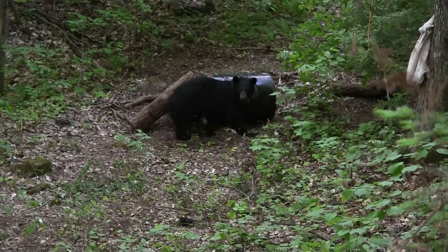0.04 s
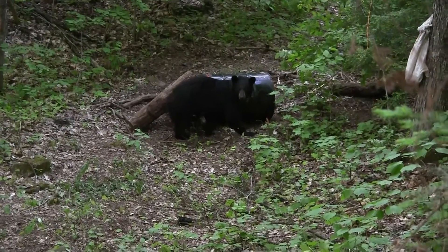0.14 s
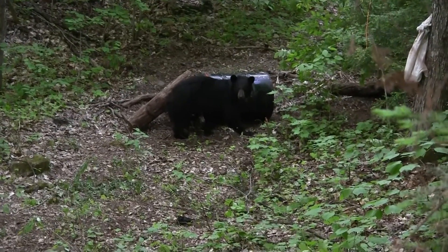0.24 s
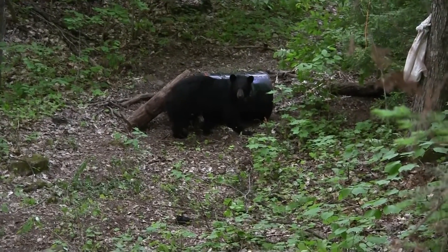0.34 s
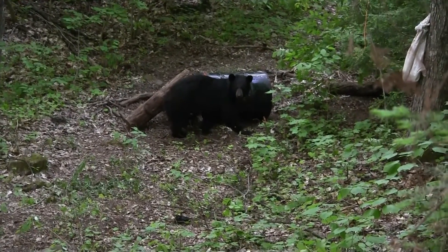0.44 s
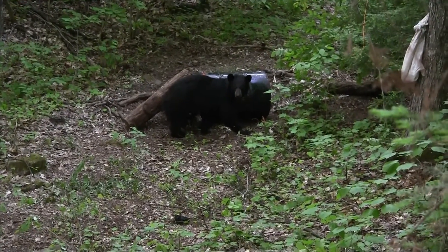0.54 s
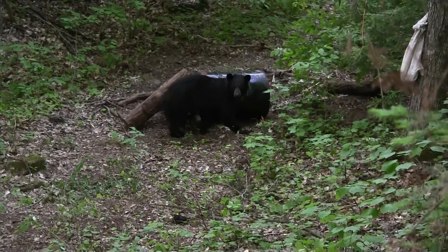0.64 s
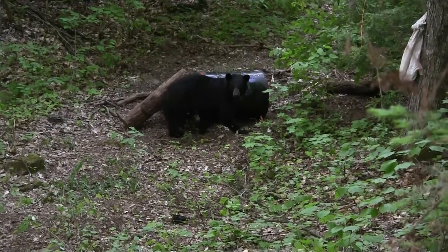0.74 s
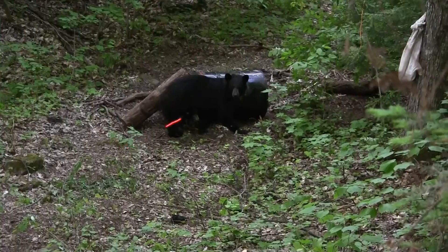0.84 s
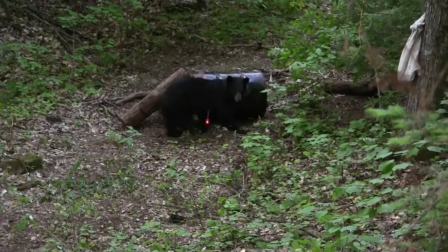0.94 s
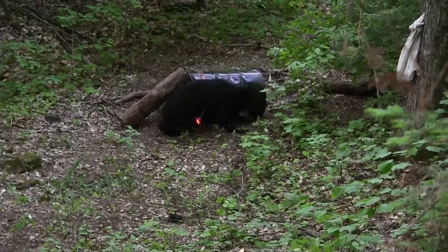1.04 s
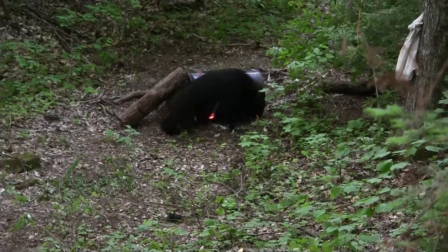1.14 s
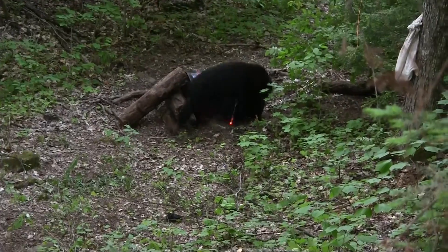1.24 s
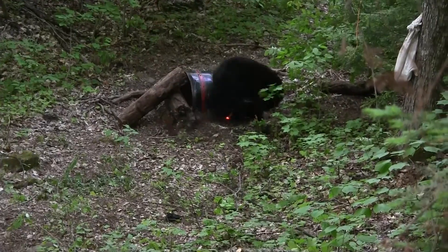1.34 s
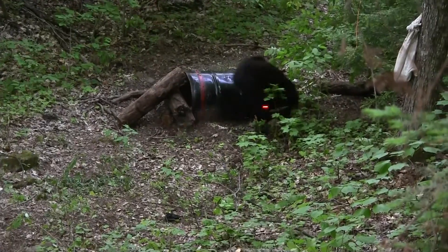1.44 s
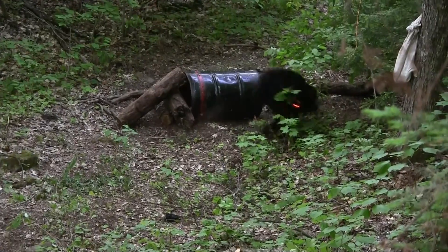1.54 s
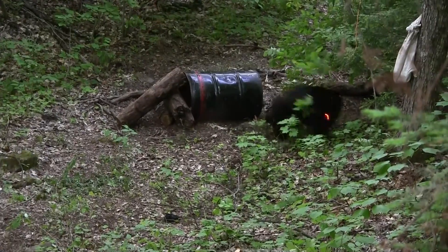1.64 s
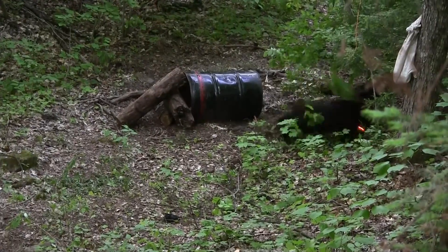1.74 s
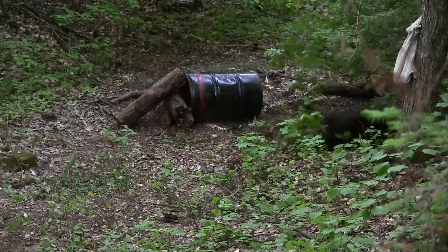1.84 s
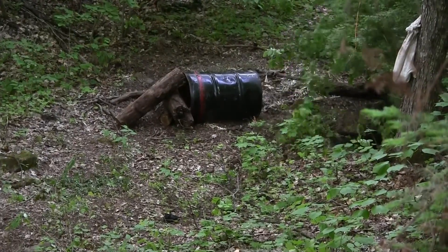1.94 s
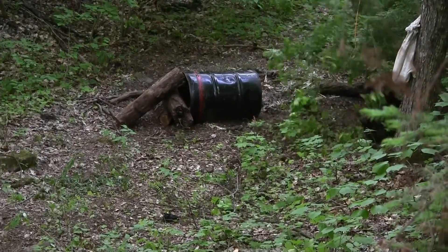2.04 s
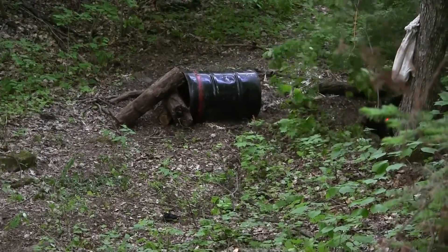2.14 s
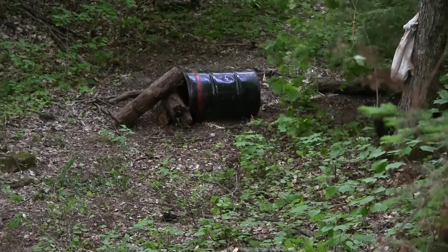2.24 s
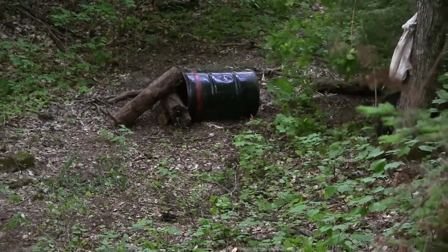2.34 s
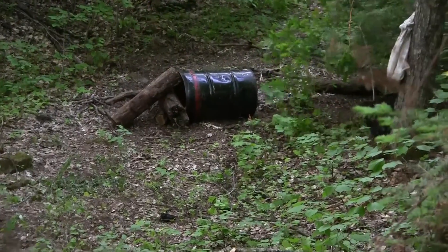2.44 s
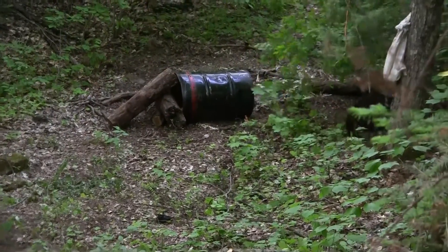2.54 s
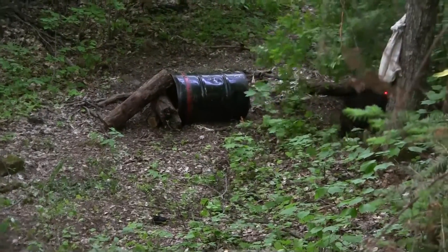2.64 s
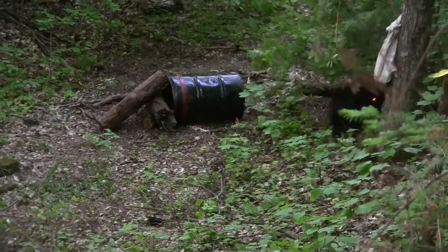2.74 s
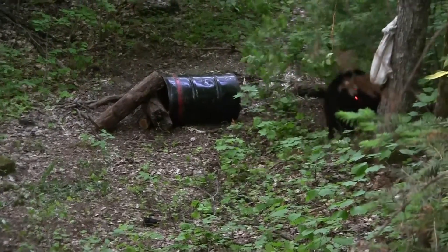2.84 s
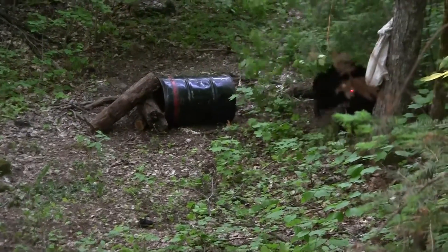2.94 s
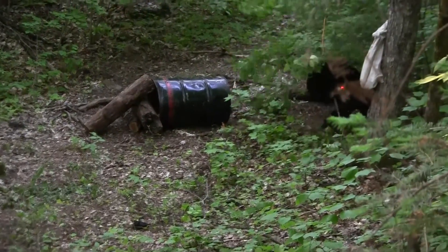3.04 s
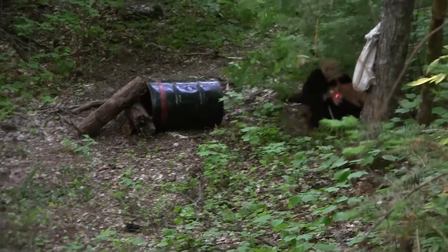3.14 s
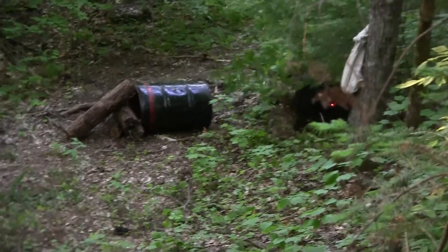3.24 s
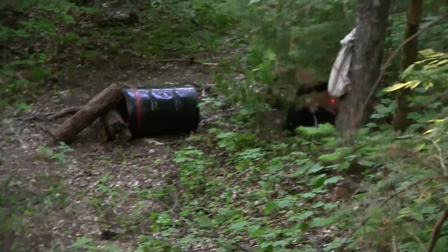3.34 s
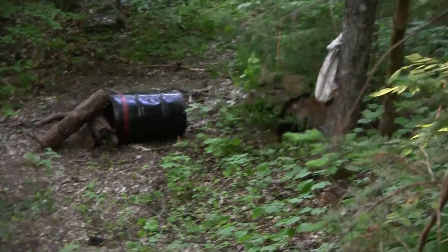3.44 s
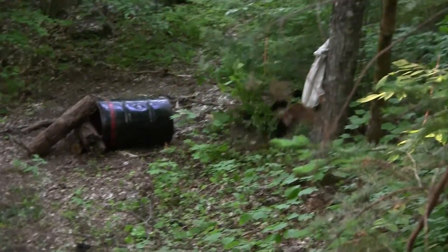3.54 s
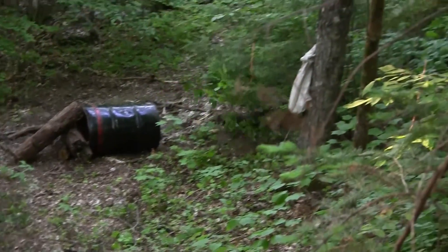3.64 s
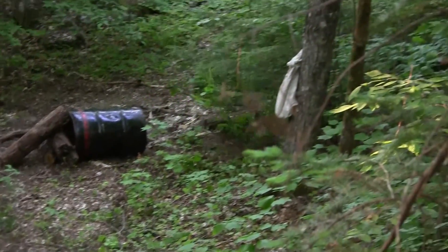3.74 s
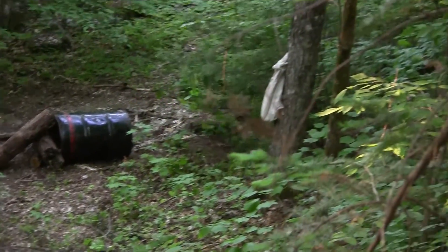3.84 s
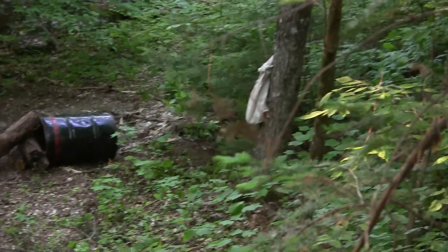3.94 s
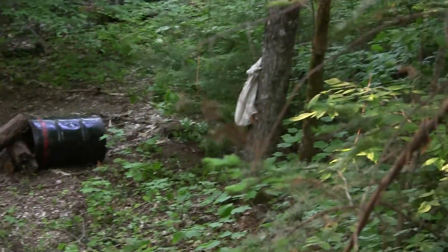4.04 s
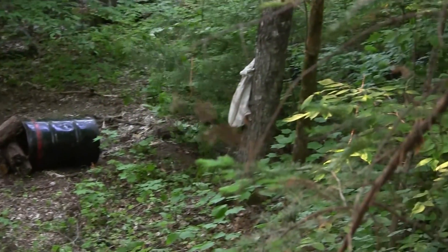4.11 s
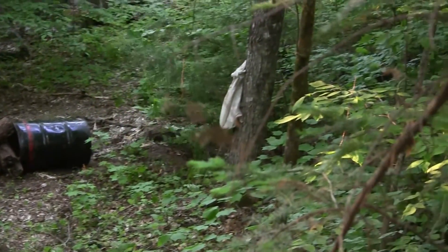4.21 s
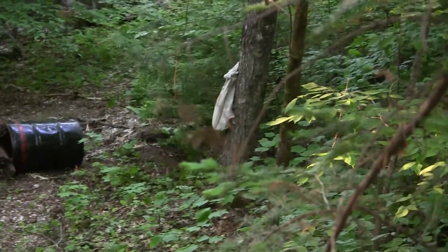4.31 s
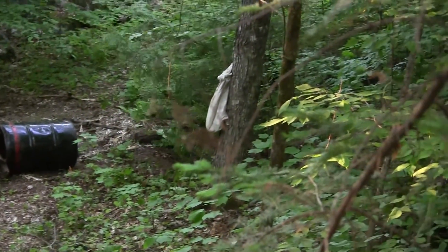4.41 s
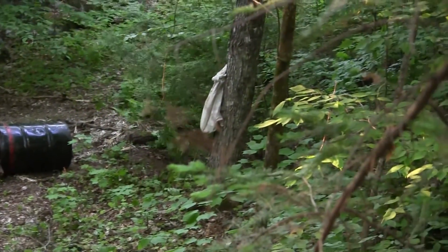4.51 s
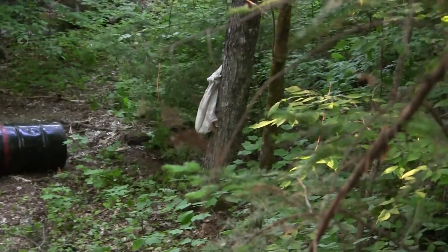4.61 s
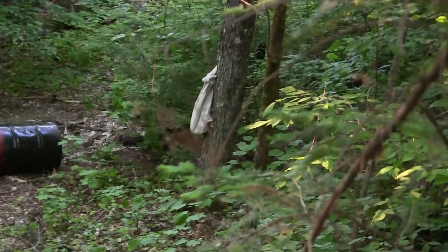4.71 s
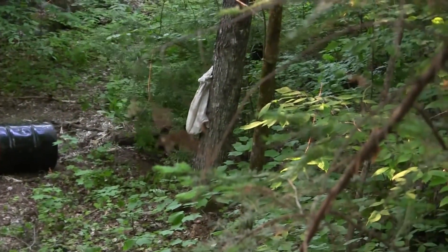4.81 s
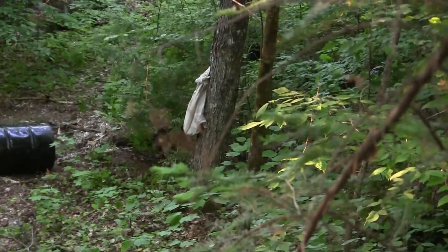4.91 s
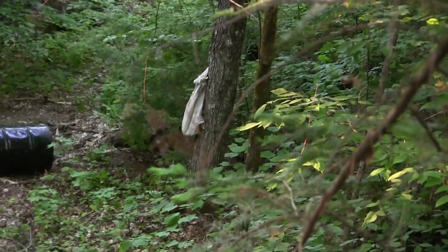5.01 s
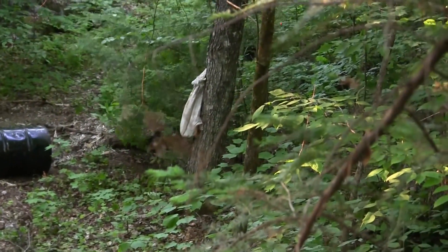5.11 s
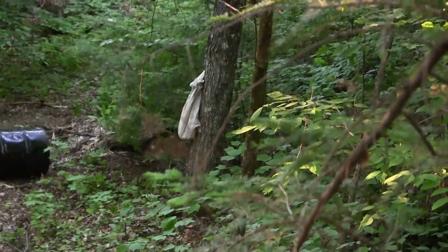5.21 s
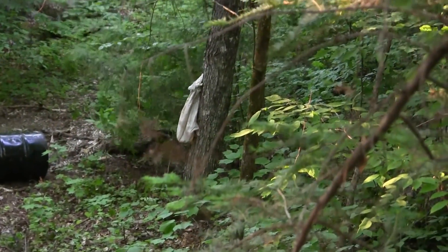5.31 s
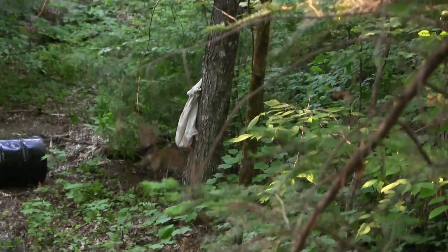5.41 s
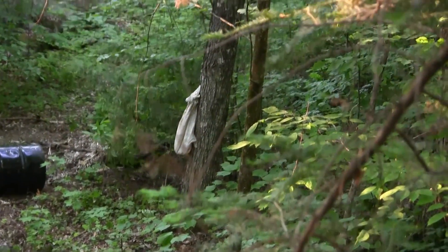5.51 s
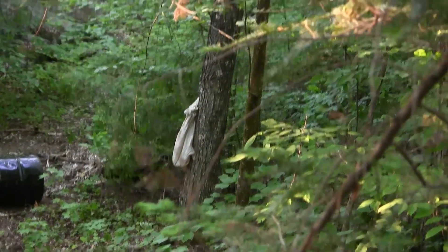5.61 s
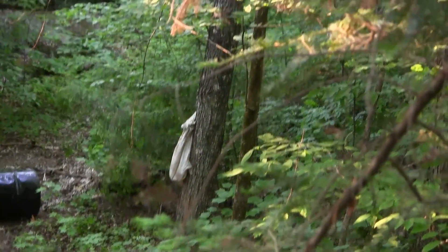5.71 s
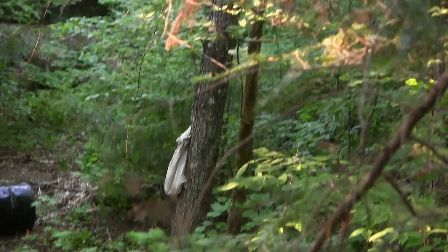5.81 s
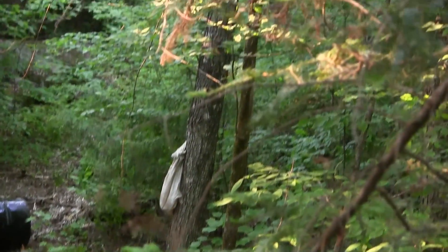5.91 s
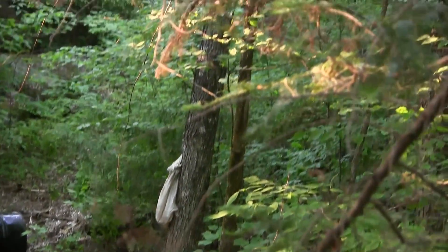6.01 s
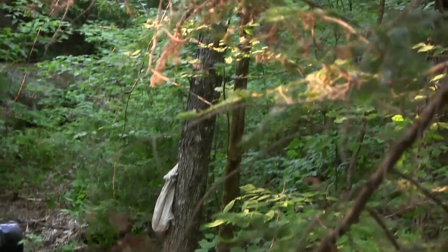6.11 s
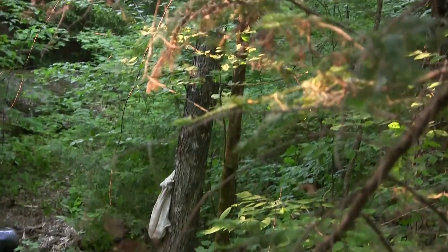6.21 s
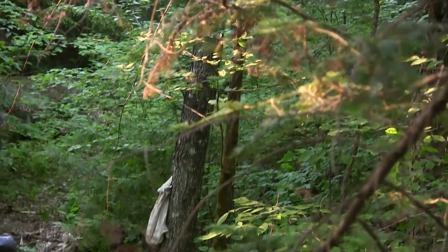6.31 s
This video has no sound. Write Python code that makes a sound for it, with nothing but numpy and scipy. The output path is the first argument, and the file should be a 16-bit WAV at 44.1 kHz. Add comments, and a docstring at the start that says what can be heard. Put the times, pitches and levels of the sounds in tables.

```python
"""Bow shot and bolting bear

A bow is shot in still woods: a small ringing click, the string's swelling noise rush, the slam of the limbs.
The arrow whacks into a bear beside a steel drum: noise bursts, a dull thump and ringing drum modes.
The trees throw the blow back as scattered noise that dies treble first.
The bear bolts through dry brush: flickering crackle, broad thuds, scuffed leaves and snapping sticks.
Quiet forest air, a steady coloured noise, lies under it all."""
import sys
import numpy as np
from scipy import signal
from scipy.fft import rfft, irfft
from scipy.io import wavfile

SR = 44100
rng = np.random.default_rng(int(sys.argv[2]) if len(sys.argv) > 2 else 0)


def output_pcm(signal):
    """Save a mono or channel-first signal as 16-bit PCM at the path in sys.argv[1].

    Samples are clipped to [-1, 1] before scaling.
    """
    pcm = np.clip(np.atleast_2d(signal).T, -1, 1) * 32767
    wavfile.write(sys.argv[1], SR, np.round(pcm).astype(np.int16))


N = 280740
T = np.arange(N) / SR  # s
RING = T[:SR]  # s since a blow
SLAM_S = 0.842  # the string stops and the limbs slam

# gain of the bow, held just left of the microphone: left level/dB, right level/dB
BOW_BALANCE = [
    [0.37],
    [-0.42],
]


def bow():
    """A catch clicks, the string rushes out to a crack, then the limbs slam and shudder."""
    return (bow_catch() + string_rush() + limb_slam()) * amp(BOW_BALANCE)


# ringing of the small catch, before its band-pass: f/Hz, level/dB, t60/s
CATCH_MODES = [(2200, -30.5, 0.028), (2460, -31.5, 0.028), (2950, -26.5, 0.013), (3740, -23, 0.0071),
               (4680, -16.5, 0.0079), (7300, -25.5, 0.0043), (11300, -22, 0.0018), (13100, -32, .003)]


def bow_catch():
    """Short metallic modes, so close that one side hears them duller and the other brighter."""
    out = np.zeros((2, N))
    click = band(ring(CATCH_MODES), 1500, 17000)
    tilt = np.array([[-0.3], [0.3]])
    add(out, 0.5535, click + tilt * np.diff(click, prepend=0))
    return out


# colour of the string while it gathers speed: f/Hz, level/dB per Hz
RUSH_COLOUR = [(59, -46), (100, -15), (818, -4), (1080, -15), (1580, -4), (2270, -2), (3190, -6), (3700, 0),
               (4380, -6), (9020, -17), (16000, -30)]
# colour of the string at full speed: f/Hz, level/dB per Hz
CRACK_COLOUR = [(50, -23), (140, -16), (330, -6), (600, -10), (1050, -1), (1600, 1), (2500, -4.5),
                (3700, 2.5), (5000, -4), (6300, -5.5), (8900, -13.5), (12000, -29), (13600, -21),
                (16000, -36)]
# air shoved by the limbs at full speed: f/Hz, level/dB, t60/s
AIR_PUSH_MODES = [(305, -13, 0.012)]
LOOSE_S, LEAVE_S = 0.8015, 0.8241  # the string starts to drive the arrow; the arrow leaves it
REST_S = 0.8109  # the arrow rest ticks as it drops away


def string_rush():
    """Air noise swells with string speed and crossfades to a crack; the rest ticks, the limbs push air."""
    out = np.zeros((2, N))
    t = np.arange(LOOSE_S, SLAM_S, 1 / SR)
    level = rush_level(t)
    full_speed = np.clip((t - 0.820) / 0.0026, 0, 1)
    add(out, LOOSE_S, shaped(RUSH_COLOUR, level * np.sqrt(1 - full_speed), width_db=7))
    add(out, LOOSE_S, shaped(CRACK_COLOUR, level * np.sqrt(full_speed), width_db=7))
    add(out, REST_S, blow(hump(5200, octaves=0.8), db=-19, t60=0.007, width_db=14))
    add(out, 0.8228, ring(AIR_PUSH_MODES) * (1 - np.exp(-RING / 0.00081)))
    return out


RUSH_START_DB, RUSH_TOP_DB, RUSH_CURVE = -40.5, -9.5, 2.6  # start, full speed, power of the swell
RUSH_CUT_S, VANES_DB = 0.0058, -42  # time for the cut to reach 60 dB; hiss of the vanes left under it


def rush_level(t):
    """Level of the string's rush: a steepening swell, then a sudden stop down to the vanes' hiss."""
    run = np.minimum((t - LOOSE_S) / (LEAVE_S - LOOSE_S), 1)
    swell_db = RUSH_START_DB + (RUSH_TOP_DB - RUSH_START_DB) * run ** RUSH_CURVE
    cut = np.maximum(t - LEAVE_S, 0) / RUSH_CUT_S
    return np.maximum(amp(swell_db - 60 * cut ** 3), amp(VANES_DB))


# limbs and riser shuddering as the string stops: f/Hz, level/dB, t60/s
LIMB_MODES = [(149, -37, 0.14), (300.6, -30.5, 0.22), (735, -27, 0.17), (963, -18.5, 0.074),
              (1151, -20, 0.15), (1260, -22, .06), (1430, -30, 0.11), (2010, -27, .07), (3200, -39, .2)]
# noise of the slam: f/Hz, level/dB per Hz
SLAM_COLOUR = [(24, -56), (40, -40), (290, -6), (479, -14.5), (697, -6), (1020, -8), (1150, 0.5),
               (1550, -8), (2000, -7), (2380, -15.5), (5720, -19), (12100, -38), (16000, -48)]
# the shot scattered by the trees: f/Hz, level/dB per Hz
BOW_ECHO_COLOUR = [(35, -61), (60, -32), (294, -7.5), (427, -16), (651, -8), (1170, -6.5), (1380, -9),
                   (2900, -4.5), (9570, -12), (12700, -16), (16000, -41)]


def limb_slam():
    """The stopped string throws its jolt into limbs and riser; modes and noise shudder, the trees answer."""
    out = np.zeros((2, N))
    add(out, SLAM_S, ring(LIMB_MODES) * (1 - np.exp(-RING / 0.0022)))
    add(out, SLAM_S, blow(SLAM_COLOUR, db=-14.0, t60=0.096, rise=0.0027, width_db=2))
    # the string slaps its stop
    add(out, 0.8458, blow(hump(6000, octaves=1.0), db=-20.5, t60=0.012, width_db=17))
    add(out, SLAM_S, woods(BOW_ECHO_COLOUR, db=-35.5, hold=0.0086, rise=0.014, damping=0.98))
    return out


# bright slap of the head cutting in: f/Hz, level/dB per Hz
PIERCE_COLOUR = [(59, -43), (100, -27), (595, 6), (1250, -8), (1760, 5), (4570, -11), (6150, -15.5),
                 (9610, -15), (13800, -22), (14700, -32), (16000, -69)]
# noise of the whack: f/Hz, level/dB per Hz
WHACK_COLOUR = [(40, -36), (120, -18), (300, -12), (600, -3), (1000, 0), (1500, -3), (2100, 3),
                (2700, -3.5), (3560, -4), (4300, -11), (5800, -15.5), (8100, -23), (11300, -17.5),
                (13800, -32), (16000, -54)]
# dull body of the whack: f/Hz, level/dB, t60/s
THUMP_MODES = [(142, -34, 0.14), (266, -22.5, 0.1), (507, -10, 0.055), (645, -10, 0.053)]
# the blow thrown back by the trees: f/Hz, level/dB per Hz
CLANG_COLOUR = [(35, -74), (60, -50), (274, -19), (323, -17.5), (398, -9), (458, -11.5), (651, -12.5),
                (698, -6), (882, -5), (1440, -3), (3120, 0.5), (6740, -20.5), (11500, -30.5), (13600, -41),
                (16000, -86)]
# strongest modes of the steel drum: f/Hz, level/dB
DRUM_MODES = [(284, -42.5), (624, -38), (707, -26.5), (797, -34), (1409, -27.5), (1657, -29), (1707, -36),
              (1981, -28), (2171, -26), (2320, -32), (2420, -27), (2529, -36), (2744, -30), (3033, -32),
              (3162, -32), (3442, -24), (3522, -26), (4130, -31)]
PIERCE_S, WHACK_S = 1.0658, 1.0735


def arrow():
    """The head cuts in with a bright slap; the whack follows and sets the drum ringing among the trees."""
    out = np.zeros((2, N))
    add(out, PIERCE_S, blow(PIERCE_COLOUR, db=-10.5, t60=0.05, width_db=-8))
    add(out, PIERCE_S, blow(hump(10000, octaves=0.27), db=-12, t60=0.0092, width_db=-6))
    add(out, WHACK_S, ring(THUMP_MODES))
    add(out, WHACK_S, blow(WHACK_COLOUR, db=-7.5, t60=0.14, rise=0.0018, width_db=-17))
    add(out, WHACK_S, woods(CLANG_COLOUR, db=-16.5, hold=0.097, rise=0.008, damping=0.97))
    # the drum dies away at the pace of the woods
    drum = ring([(hz, db, read(WOODS_DECAY, hz)) for hz, db in DRUM_MODES])
    add(out, WHACK_S, drum * (1 - np.exp(-RING / 0.022)))
    # a stand of trunks answers late
    add(out, 1.168, blow(CLANG_COLOUR, db=-13.5, t60=0.17, rise=0.011, width_db=5))
    return out


def bear():
    """The bolting body drags, treads and breaks things, each a burst of coloured noise or struck wood."""
    return scuffs() + footfalls() + stick_snaps() + log_strike()


# paws and flanks dragged through litter, level before flutter:
# middle t/s, length/s, level/dB, centre f/Hz, width/octaves
SCUFF_EVENTS = [(1.656, 0.042, -52, 9000, 0.55), (1.70, .056, -38.5, 820, .38),
                (1.723, 0.03, -42, 9600, 0.25), (1.784, .06, -41, 750.6, 0.62),
                (1.927, .07, -36.5, 615, 0.46), (2.885, 0.042, -36.5, 1960, 1),
                (2.928, 0.061, -41, 746, 0.64), (2.98, .04, -39.5, 890, 0.89),
                (3.533, 0.067, -47.5, 1000, 0.8), (3.975, .04, -48, 1200, 1.0),
                (6.151, 0.14, -46, 960, 0.63)]


def scuffs():
    """Each drag rubs up and fades like an arch, its level fluttering as litter catches and lets go."""
    out = np.zeros((2, N))
    for s, length, db, hz, octaves in SCUFF_EVENTS:
        stroke = np.sqrt(np.abs(np.sin(np.linspace(0, np.pi, int(length * SR)))))
        envelope = amp(db) * stroke * flutter(len(stroke), depth_db=2.5, over_s=0.004)
        add(out, s - length / 2, shaped(hump(hz, octaves), envelope, width_db=-13))
    return out


# heavy footfalls: t/s, level/dB, centre f/Hz, t60/s
FOOTFALL_EVENTS = [(1.267, -48, 131, 0.29), (1.297, -46.5, 149, 0.42), (1.691, -52, 270, 0.21),
                   (1.775, -50, 230, .2), (1.907, -41.5, 190, 0.18), (2.296, -49.5, 171, 0.26),
                   (2.555, -49, 170, 0.17), (2.651, -37, 182, 0.052), (2.785, -48, 85, .28),
                   (2.959, -49.5, 222, 0.36), (3.405, -39.5, 186, 0.081), (3.915, -44, 202, 0.17),
                   (4.794, -39, 105, .08), (5.075, -53, 150, 0.17), (5.17, -53.5, 140, 0.17),
                   (5.481, -56, 130, 0.16), (6.14, -54, 129, .19), (6.217, -39.5, 137, 0.11)]


def footfalls():
    """Weight landing on soft ground: a low, broad resonance with a gentle onset."""
    out = np.zeros((2, N))
    for s, db, hz, t60 in FOOTFALL_EVENTS:
        add(out, s, blow(hump(hz, octaves=0.59), db, t60, rise=0.0022))
    return out


# the loudest sticks that snap: t/s, level/dB, centre f/Hz, width/octaves
SNAP_EVENTS = [(1.93, -33, 800, 0.34), (2.137, -34, 1200, 0.78), (2.6533, -20, 1400, 0.16),
               (2.6531, -20.5, 3630, 1.05), (2.895, -29, 1760, 0.24), (3.3732, -34.5, 1300, 1.1),
               (3.472, -42, 1200, 0.49), (3.538, -35, 2500, 1.1), (3.747, -31.5, 2360, 0.45),
               (3.914, -38, 800, 0.74), (3.98, -36, 1250, .9), (4.082, -43, 5000, 1.3),
               (4.6845, -33, 1340, 1.15), (4.792, -29.5, 785, 1.34), (6.025, -44, 800, .8)]
# the thickest stick splintering on after its snap: f/Hz, level/dB per Hz
SPLINTER_COLOUR = [(120, -41), (200, -13), (569, -11.5), (763, -13), (1320, -9), (1810, -9), (2290, -6.5),
                   (4770, -13), (9750, -3), (16000, -27)]
SNAP_T60 = 0.023  # s, dry wood hardly rings
SPLINTER_S = 2.654


def stick_snaps():
    """Dry wood fails in a sharp burst, with a faint, longer answer from the trees."""
    out = np.zeros((2, N))
    for s, db, hz, octaves in SNAP_EVENTS:
        add(out, s, blow(hump(hz, octaves), db, SNAP_T60))
        add(out, s, blow(hump(hz, octaves), db - 21, t60=0.39, rise=0.0098))
    add(out, SPLINTER_S, blow(SPLINTER_COLOUR, db=-27.0, t60=0.23, rise=0.0024, width_db=0.5))
    return out


# ringing of a dead log: f/Hz, level/dB, t60/s
LOG_MODES = [(311, -39, 0.18), (623, -43, 0.18), (1140, -46, 0.24), (2120, -40, 0.28), (2230, -32.5, 0.08),
             (2800, -33.5, 0.058), (4460, -37, 0.055)]
# noise of the knock on it: f/Hz, level/dB per Hz
LOG_COLOUR = [(59, -45), (100, -28), (310, -8), (1770, -3), (1920, -8), (2180, -7), (2580, -6), (7050, -18),
              (15000, -38)]
LOG_S = 2.2925


def log_strike():
    """A dead log struck in passing: wooden modes under a knock and a short bright burst."""
    out = np.zeros((2, N))
    add(out, LOG_S, ring(LOG_MODES))
    add(out, LOG_S, blow(LOG_COLOUR, db=-34.5, t60=0.19))
    add(out, LOG_S, blow(hump(4200, octaves=0.63), db=-34, t60=0.032))
    return out


# colour of stirred brush, before the split into bands: f/Hz, level/dB per Hz
BRUSH_COLOUR = [(40, -21), (80, -6), (160, -6), (270, -1), (410, -8.5), (540, 1), (880, -2), (1050, -1),
                (1210, -6.5), (1600, 0), (3000, -2), (4100, -1), (7000, -9.5), (11000, -12), (13200, -19),
                (16000, -42)]


def brush():
    """Litter, twigs and dry leaves crackle in three bands, stirred all along the bear's run."""
    swish, fizz, weight = stirring()
    ground = weight * colour(band(crackle(per_s=500, wash=1.42), 47, 1080), BRUSH_COLOUR, width_db=1.0)
    twigs = swish * colour(band(crackle(per_s=700, wash=2.2), 975, 4820), BRUSH_COLOUR, width_db=-6.5)
    leaves = fizz * colour(band(crackle(per_s=1300, wash=2.1), 5200, 14700), BRUSH_COLOUR, width_db=-0.5)
    return (ground + twigs + leaves) * flutter(N, depth_db=1.0, over_s=0.014) + small_snaps(swish)


# one bush after another shoved aside, levels before flutter:
# t/s, length/s, twig level/dB, leaf level over twigs/dB, ground level over twigs/dB
BUSHES = [(1.673, 0.18, -39.5, -6.5, -6.5), (1.917, .15, -44, -1.5, -5), (2.327, .08, -55.5, -1.5, -5.5),
          (2.618, .17, -45, 1, -13), (2.834, 0.058, -41.5, -1.5, -4), (3.022, 0.26, -49, 0, -15),
          (3.333, 0.36, -51, -2.5, -4.5), (3.723, 0.12, -47, -0.5, -10.5), (3.9, 0.029, -47.5, -2, -4),
          (4.53, 0.21, -49, -3, -7), (4.78, 0.077, -46, -3, -13), (4.972, 0.32, -49, -4.5, -6.5),
          (5.429, 0.3, -48, -5, -11.5), (6.085, .17, -47.5, -7.5, -6)]
# faint stir of the undergrowth, before flutter: level/dB of twigs, of leaves, of ground
STIR_LEVELS = [-55.5, -59, -59]
BEND_S, SETTLE_DB_PER_S = 0.052, 56  # every bush bends quickly and settles slowly
BOLT_S, BOLT_RISE_S = 1.38, 0.12  # the undergrowth starts to stir; time to full level


def stirring():
    """Levels of twigs, leaves and ground: each bush bends, thrashes while the bear passes, and settles."""
    t = T[::100]
    power = amp(STIR_LEVELS)[:, None] ** 2 * np.clip((t - BOLT_S) / BOLT_RISE_S, 0, 1) ** 2
    for s, length, db, leaf_db, ground_db in BUSHES:
        bend = np.clip((t - s) / BEND_S, 0, 1)
        shove = bend * amp(db - SETTLE_DB_PER_S * np.maximum(t - s - length, 0))
        power = power + (amp([[0], [leaf_db], [ground_db]]) * shove) ** 2
    return [np.interp(T, t, level) for level in np.sqrt(power)]


def crackle(per_s, wash):
    """Countless tiny leaf fractures of uneven size over a smooth wash."""
    size_db = 3.5 * np.minimum(rng.exponential(1, N), 3.5)
    fractures = amp(size_db) * (rng.random(N) < per_s / SR)
    return evened(fractures * rng.choice([-1, 1], (2, N))) + wash * rng.standard_normal((2, N))


TWIGS_PER_S, TWIG_LOW_HZ, TWIG_HIGH_HZ = 14, 800, 5000  # rate over all thicknesses, range of pitches
TWIG_DB = 5.5  # over the swish, before a random -3.25 to +2.5 dB


def small_snaps(swish, count=4):
    """Twigs of a few thicknesses break at random, louder where the brush is shoved harder."""
    out = np.zeros((2, N))
    for hz in np.geomspace(TWIG_LOW_HZ, TWIG_HIGH_HZ, count):
        strength = swish * amp(2.5 * rng.uniform(-1.3, 1, N))
        breaks = strength * (rng.random(N) < TWIGS_PER_S / count / SR)
        snap = blow(hump(hz, octaves=0.76), TWIG_DB, SNAP_T60)[:, :SR // 10]
        add(out, 0, signal.oaconvolve(breaks[None], snap, axes=1))
    return out


# decay among the trees, before each answer's damping: f/Hz, t60/s
WOODS_DECAY = [(100, 1.4), (700, 1.03), (2000, 0.97), (3500, 0.77), (5500, 0.67), (10000, 0.55),
               (15000, 0.61)]


def woods(spectrum, db, hold, rise, damping):
    """Scatter from trunks all round: level while the near trees answer, then dying, treble first."""
    hz, t, z = signal.stft(noise(spectrum, len(RING), width_db=5.0), SR, nperseg=512)
    z = z * amp(-60 * damping * np.maximum(t - hold, 0) / read(WOODS_DECAY, hz)[:, None])
    scatter = signal.istft(z, SR, nperseg=512)[1][:, :len(RING)]
    return amp(db) * scatter * (1 - np.exp(-RING / rise))


# colour of quiet forest air: f/Hz, level/dB per Hz
AIR_COLOUR = [(18, -48), (30, -11), (131, -4.5), (311, -1), (486, -4), (540, -3), (988, -7), (2060, -8),
              (2750, -10), (6720, -15.5), (13300, -25.5), (14800, -27), (16000, -19.5)]


def forest_air():
    """Steady, wide noise of the still woods."""
    return amp(-62.2) * noise(AIR_COLOUR, N, width_db=14.0)


def ring(modes):
    """Struck modes, neighbours swinging in opposite directions."""
    total = 0
    for k, (hz, db, t60) in enumerate(modes):
        total = total + (-1) ** k * amp(db - 60 * RING / t60) * np.sin(2 * np.pi * hz * RING)
    return total


def blow(spectrum, db, t60, rise=0.00018, width_db=-4):
    """A noise burst that rises quickly and dies away."""
    return shaped(spectrum, amp(db - 60 * RING / t60) * (1 - np.exp(-RING / rise)), width_db)


def shaped(spectrum, envelope, width_db=0):
    """Noise under an envelope, carrying exactly the envelope's energy."""
    burst = evened(noise(spectrum, len(envelope), width_db) * envelope)
    return burst * np.sqrt(np.mean(envelope ** 2))


def flutter(size, depth_db, over_s):
    """Uneven gain, as stems catch and let go in clumps."""
    knots = np.arange(0, size + SR * over_s, SR * over_s)
    return amp(depth_db * np.interp(np.arange(size), knots, rng.uniform(-2.25, 1, len(knots))))


def hump(hz, octaves):
    """Spectrum of one broad resonance with gentle skirts, 7 dB down at the given octaves off centre."""
    f = np.geomspace(20, SR / 2, 200)
    return np.transpose([f, -40 * np.log10(1 + (np.log2(f / hz) / octaves) ** 2 / 2)])


def noise(spectrum, size, width_db=0):
    """Stereo noise of a given colour."""
    return colour(rng.standard_normal((2, size)), spectrum, width_db)


# stereo width, before each sound's own width_db: f/Hz, side-over-mid level/dB
STEREO_WIDTH = [(100, -23.5), (400, -17.5), (800, -20), (2000, -19.5), (4000, -18), (8000, -13),
                (14000, -13)]


def colour(source, spectrum, width_db=0):
    """Filters a mid and a side signal into a left-right pair of unit rms."""
    hz = np.fft.rfftfreq(source.shape[1], 1 / SR)
    mid, side = rfft(source) * amp(read(spectrum, hz))
    side = side * amp(read(STEREO_WIDTH, hz) + width_db)
    return evened(irfft([mid + side, mid - side], source.shape[1]))


def band(x, lo_hz, hi_hz):
    """Band-pass with soft edges."""
    sos = signal.butter(3, [lo_hz, min(hi_hz, SR / 2 - 1)], "band", fs=SR, output="sos")
    return signal.sosfilt(sos, x)


def read(points, hz):
    """Reads a table on a log-frequency axis."""
    f, value = np.transpose(points)
    return np.interp(np.log(hz + 1), np.log(f + 1), value)


def amp(db):
    """Decibels to gain."""
    return 10 ** (np.asarray(db) / 20)


def evened(x):
    """Scales to unit rms."""
    return x / np.sqrt(np.mean(x ** 2) + 1e-20)


def add(mix, s, sound):
    """Mixes a sound in at time s."""
    part = mix[:, round(s * SR):][:, :sound.shape[-1]]
    part += sound[..., :part.shape[1]]


def scene():
    """The shot, the hit and the bear's run over quiet forest air."""
    return bow() + arrow() + bear() + brush() + forest_air()


def record(dry):
    """The microphone sheds deep bass; full-scale limit, then a steep treble limit."""
    thinned = signal.sosfilt(signal.butter(2, 55, "high", fs=SR, output="sos"), dry)
    treble_limit = signal.firwin(511, 15850, window=("kaiser", 9), fs=SR)  # Hz
    return signal.oaconvolve(np.clip(thinned, -1, 1), treble_limit[None], "same")


dry = scene()
out = record(dry)
output_pcm(out)
```